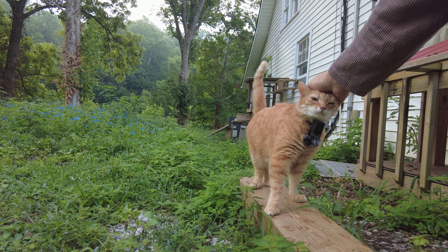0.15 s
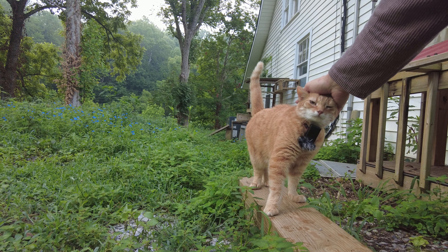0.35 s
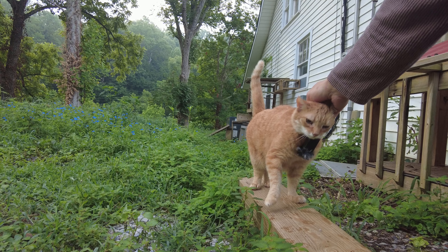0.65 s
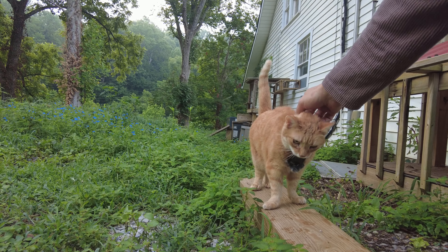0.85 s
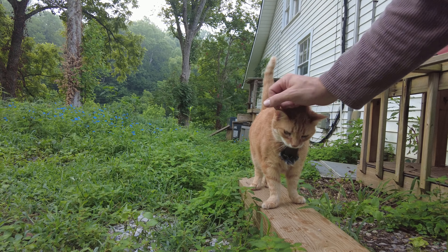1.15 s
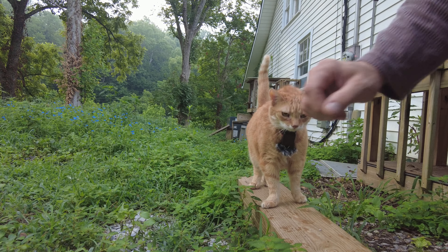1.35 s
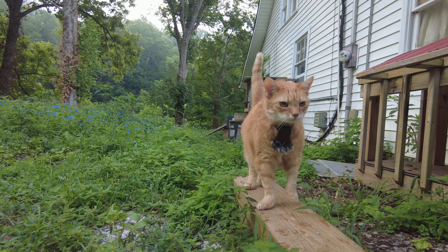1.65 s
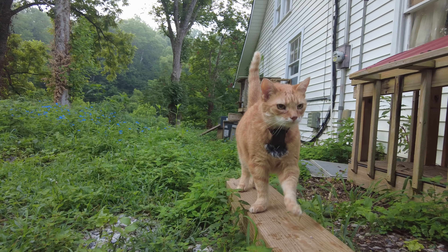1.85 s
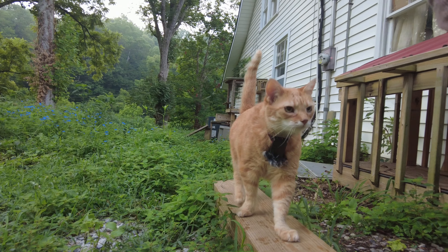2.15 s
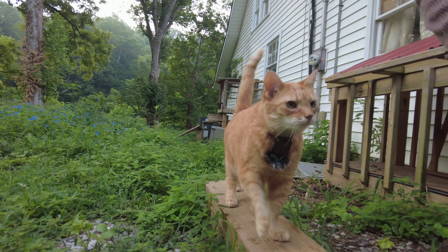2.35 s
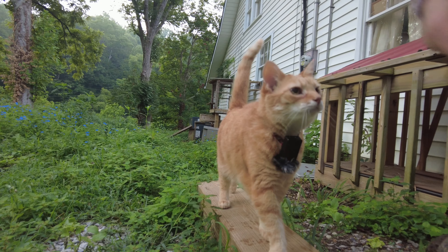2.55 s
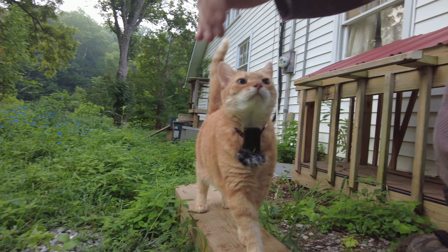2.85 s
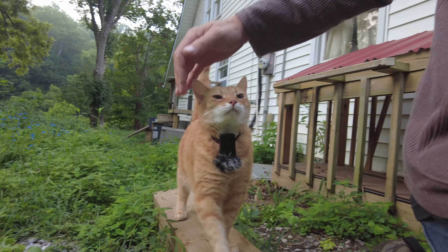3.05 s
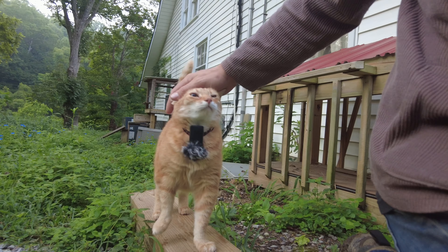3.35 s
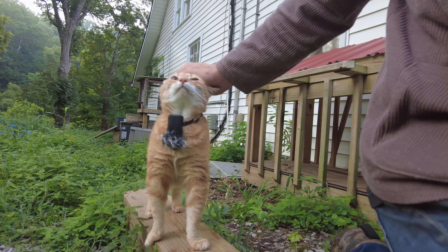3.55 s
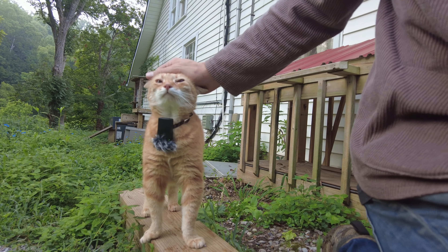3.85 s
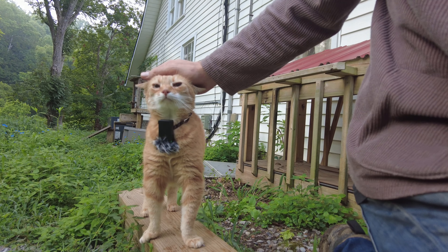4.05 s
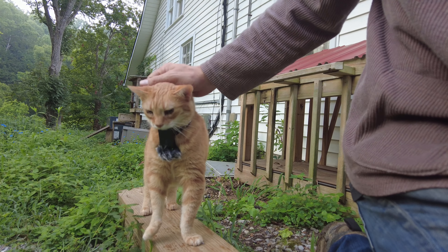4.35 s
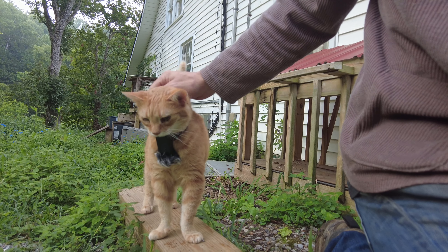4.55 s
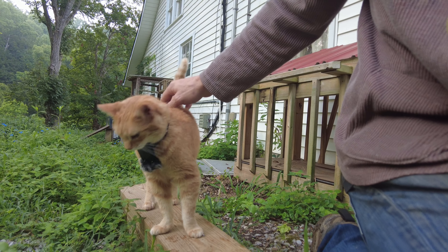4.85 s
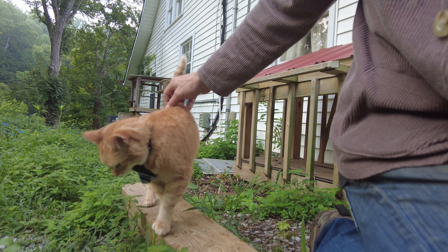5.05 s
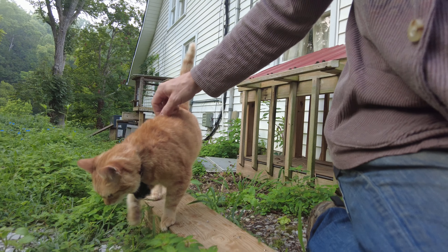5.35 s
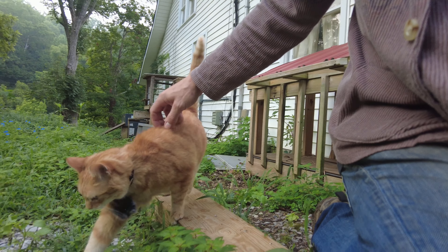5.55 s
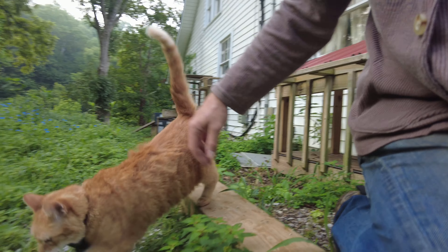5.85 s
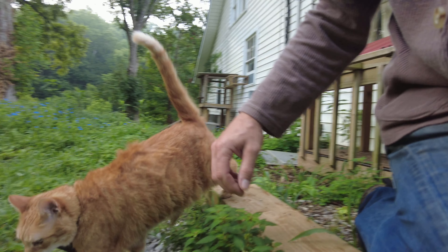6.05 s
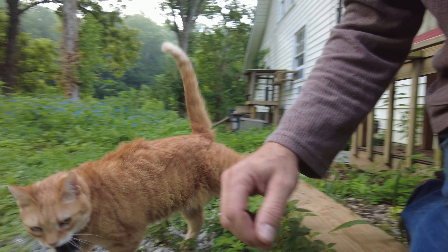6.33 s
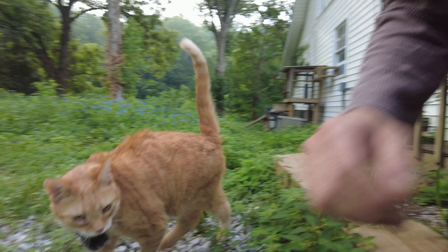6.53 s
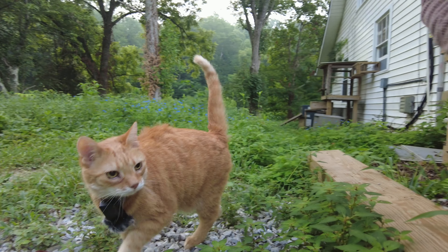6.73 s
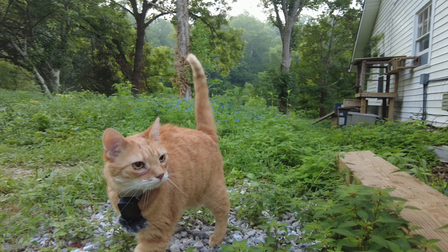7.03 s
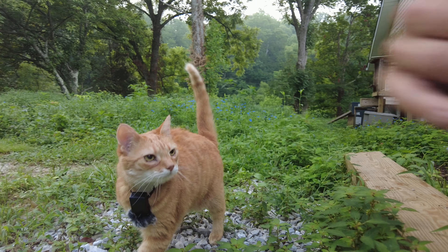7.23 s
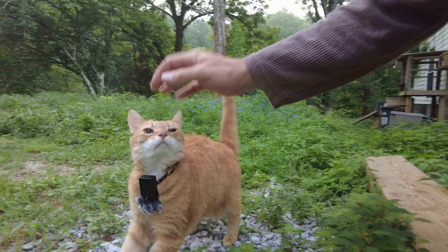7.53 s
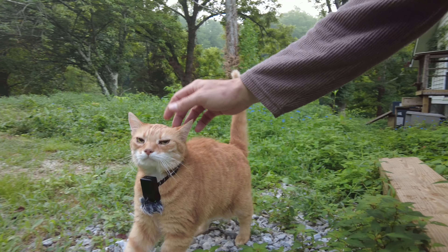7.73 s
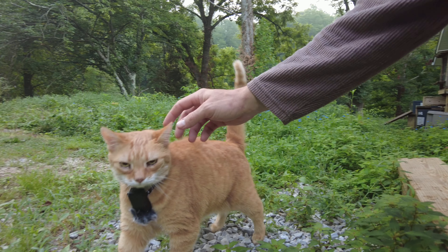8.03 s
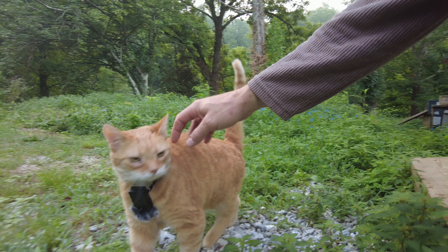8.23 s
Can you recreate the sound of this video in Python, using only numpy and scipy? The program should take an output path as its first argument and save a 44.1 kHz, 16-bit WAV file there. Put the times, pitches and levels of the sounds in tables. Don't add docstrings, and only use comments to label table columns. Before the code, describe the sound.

A steady high insect chorus shimmers over low distant rumble while birds whistle, a cat purrs softly, and twigs and gravel click underfoot.

```python
import sys
import numpy as np
from scipy import signal
from scipy.fft import rfft, irfft, next_fast_len
from scipy.io import wavfile
from scipy.ndimage import uniform_filter1d

SR = 44100
rng = np.random.default_rng(int(sys.argv[2]) if len(sys.argv) > 2 else 0)


def amplitude_ratio(level_db):
    exponent = np.asarray(level_db, float) / 20
    return 10 ** exponent


def store_pcm(level_fs):
    pcm = np.round(np.clip(level_fs, -1, 1) * 32767).astype(np.int16)
    wavfile.write(sys.argv[1], SR, np.atleast_2d(pcm).T)


N = 369999

# (lowest pitch [Hz], highest pitch [Hz], ring width [Hz], level [dB], gain when more join [dB])
CROWDS = [
    (4400, 4834, 280, -3.5, 5),
    (5320, 6010, 690, -4, -0.5),
    (5900, 6620, 220, 3.5, 0),
    (7100, 7880, 280, -15, 2),
]
# (time [s], level [dB])
CHORUS_SWELL = [
    (0, -47.5),
    (1.4, -47.5),
    (1.9, -47),
    (3.0, -45),
    (5.1, -45.5),
    (5.9, -47.5),
    (6.3, -46.5),
    (7.4, -47.5),
    (8.39, -47.5),
]
# (start [s], length [s], level over rest [dB])
NEAR_BOUTS = [
    (1.2, 1.8, 6),
]
ONCE = [0]
SWOOP = [0, .24]
STEP = [0, .25]
BUZZ = [0, .352]
HOOK = [0, .225]
END = [0, .21, .41]
# (repeat delays [s], notes as (time [s], length [s], start [Hz], end [Hz], level [dB]))
FIGURES = [
    (ONCE, [(1.64, .085, 5570, 4870, -44), (1.72, 0.086, 5000, 3260, -38.5), (1.848, 0.0277, 3450, 4430, -36), (2.88, 0.058, 5420, 5430, -42), (4.312, 0.032, 4150, 4830, -40.5), (4.352, .03, 5000, 3480, -45)]),
    (SWOOP, [(2.012, 0.038, 6070, 6080, -36.5), (2.04, 0.042, 5900, 3200, -33), (2.1, .02, 3240, 4980, -38.5), (2.118, 0.026, 4900, 4850, -35)]),
    (STEP, [(2.495, 0.087, 3674, 2915, -42.5), (2.588, 0.013, 3610, 5470, -39), (2.598, .05, 5360, 5470, -43), (2.657, 0.021, 6100, 3320, -34), (2.69, 0.036, 5440, 5500, -56)]),
    (BUZZ, [(3.197, 0.025, 4875, 4400, -39), (3.218, .02, 4400, 3350, -37.5)]),
    (HOOK, [(3.862, 0.0296, 3970, 3090, -47), (3.91, 0.026, 5750, 4760, -39), (3.938, 0.058, 4730, 5700, -40.5)]),
    (END, [(4.385, 0.052, 2560, 3060, -52.5), (4.412, 0.051, 3082, 2990, -47)]),
]
# (time [s], length [s], pitch [Hz], level [dB])
BUZZES = [
    (3.24, 0.11, 3480, -46.5),
    (3.592, 0.12, 3300, -48),
]
# (time [s],
# length [s], start [Hz], end [Hz], level [dB])
CHIPS = [(0.259, 0.077, 1970, 2940, -62), (0.557, 0.019, 3800, 3430, -58), (1.987, 0.023, 7100, 7920, -48),
         (2.225, 0.029, 7200, 7760, -48), (2.233, 0.14, 2300, 2630, -64), (2.373, 0.061, 2410, 2200, -64),
         (3.241, 0.14, 3780, 3700, -54), (3.6, 0.099, 3430, 3200, -57), (3.517, 0.029, 6650, 8200, -42.5),
         (3.833, .02, 7940, 7400, -52), (4.06, 0.02, 8200, 7200, -51), (4.083, .025, 7200, 7100, -51),
         (5.46, 0.017, 7000, 8200, -48), (6.368, 0.12, 2690, 2333, -59), (7.671, .02, 5900, 8240, -39.5),
         (7.721, .015, 5600, 7706, -47), (8.223, .02, 7060, 8360, -55)]
# (start [s], length [s], effort [dB], pulse rate [1/s])
BREATHS = [(-.1, 0.58, -75, 29), (0.984, 0.27, -63, 34), (1.42, 0.48, -59, 32), (2.014, 0.22, -54, 32.5),
           (2.516, .85, -59, 31), (3.56, 0.43, -60.5, 33), (4.07, 0.93, -61, 33.4), (5.052, .17, -61.5, 33),
           (5.588, 1, -57, 30.9), (6.53, 0.68, -54.5, 32.9), (7.412, .66, -56, 30),
           (8.235, 0.21, -58.5, 32.2)]
# (pitch [Hz], width [Hz], level [dB])
CHEST = [
    (334, 240, 7.5),
    (1396, 290, 1),
    (1563, 190, -0.5),
]
# (start [s], length [s], level [dB])
STROKES = [(-.3, 1.62, -78), (1.5, 0.59, -77), (2.0, 0.37, -68.5), (2.4, 1.23, -73.5), (3.55, 0.36, -71.5),
           (4.05, 0.94, -73), (5.08, 0.29, -79), (5.6, 0.761, -72), (6.1, 0.88, -66), (7.06, 0.44, -58),
           (7.4, 0.96, -78)]
# (frequency [Hz], density [dB per Hz])
FUR_TONE = [(470, -35), (800, 1), (964, -12), (1300, 2.5), (1840, -5), (3100, -1), (4080, -2.5),
            (6220, -15), (7040, -10.5), (15600, -13.5)]
# (time [s], peak [dB], left minus right [dB])
TWIGS = [(0.9921, -47, 7), (1.272, -48, 5), (1.3144, -50, 11), (1.6472, -47, 5), (5.8616, -44, 10),
         (6.0874, -38, -10), (6.7437, -43, 5), (6.8483, -45, 10), (6.91, -33, 4), (7.0178, -18, -1),
         (7.0283, -26.5, 7), (7.5231, -46, 3), (8.0391, -41, -4), (6.5492, -41, -4)]
# (time [s], peak [dB], left minus right [dB])
GRAVEL = [(5.7598, -41.5, 3), (6.0327, -31.5, -5), (6.4487, -33, -8.5), (6.4644, -44, -3),
          (6.516, -36.5, -4), (6.6227, -52, -1), (6.6782, -39, -3), (7.0244, -37, -8), (7.0304, -26.5, 2.1),
          (7.4829, -43, 5), (8.113, -34, -3)]
# (time [s], peak [dB], left minus right [dB])
KNOCKS = [(0.5885, -46, 3), (1.0266, -53, -2), (6.1692, -43, 2), (6.1973, -47, 2.1), (6.9774, -44.5, 9),
          (8.3324, -46.5, 3)]
# (events, body pitch [Hz], body width [Hz], relative body level [dB], relative top level [dB])
CLICK_KINDS = [
    (TWIGS, 3900, 3600, -15, -12),
    ([(6.0393, -29.5, 1)], 2700, 3700, -15, 6.4),
    (GRAVEL, 2560, 5600, -4.5, 4),
    (KNOCKS, 550, 4100, 2.6, -16),
]
# (frequency [Hz], density [dB per Hz])
RUMBLE_TONE = [(8.8, -42), (15, 4), (80, -3), (144, -11), (174, -17.5), (210, -20), (389, -29.5),
               (424, -31), (720, -40.5), (900, -44.5), (1170, -45), (1980, -120)]
# (level [dB], share of traffic swell [ratio], random gusts [dB])
RUMBLE_LAYERS = [
    (-34.5, 0.067, -1.6),
    (-44.5, 0.65, 1.3),
    (-53, 0.4, 0.9),
]
# (time [s], level [dB])
TRAFFIC = [
    (0, 4.5),
    (1.1, -2),
    (2.0, -0.5),
    (3.0, 2.5),
    (3.6, -1.5),
    (5.3, -2),
    (5.9, 2),
    (7.3, 7.5),
    (8.39, 2.5),
]
# (frequency [Hz], density [dB per Hz])
AIR_TONE = [(410, -68), (700, -52), (896, -38.5), (1010, -42.5), (1260, -12), (2310, -19), (2530, -16),
            (3080, -16), (3940, -27), (4430, -21), (5240, -12), (6200, -22), (7840, -30.5), (8700, -26.5),
            (15600, -23)]
# (start [s], length [s], strength against the full drop [dB])
MIDDLE_DROPS = [
    (1.19, 0.34, -2),
    (3.93, 0.13, -2.5),
    (4.88, 0.23, -1.5),
    (5.2, 0.49, -1),
]
# (frequency [Hz], left-right likeness [ratio])
LIKENESS = [(60, 0.96), (180, 0.97), (550, 0.075), (1650, -0.076), (4970, 0.17), (15000, -0.19)]
# (frequency [Hz], left minus right [dB])
LEAN = [(60, -1.5), (150, 0.5), (380, 1), (950, 1.5), (2380, 0.5), (5980, -1.0), (15000, 3.5)]
# (centre [Hz], width [Hz], depth [dB])
TREBLE_DIP = (13800, 590, -7.5)


def evened(x):
    return x / np.sqrt(np.mean(x ** 2) + 1e-20)


def read(points, hz):
    f, value = np.transpose(points)
    return np.interp(np.log(hz + 1), np.log(f + 1), value)


def curve(rows, column):
    rows = np.array(rows)
    return np.interp(np.arange(N) / SR, rows[:, 0], rows[:, column])


def ramp(s, rise_s):
    return np.clip((np.arange(N) / SR - s) / rise_s, 0, 1)


def spans(rows, edge):
    t = np.arange(0, N / SR, .002)
    power = np.zeros(len(t))
    for start, length, db, *_ in rows:
        u = (t - start) / length
        to_edge = np.clip(2 * np.minimum(u, 1 - u) / edge, 0, 1)
        power += amplitude_ratio(2 * db) * np.sin(np.pi / 2 * to_edge) ** 4
    return np.interp(np.arange(N) / SR, t, power)


def add(mix, s, sound):
    part = mix[..., round(s * SR):][..., :sound.shape[-1]]
    part += sound[..., :part.shape[-1]]


def ring(x, hz, width_hz):
    b, a = signal.iirpeak(hz, hz / width_hz, SR)
    return signal.lfilter(b, a, signal.lfilter(b, a, x))


def ports(x, lag):
    taps = np.arange(-24, 25)
    window = np.hanning(len(taps))
    return np.array([np.convolve(x, np.sinc(taps - side * lag / 2) * window, "same") for side in (1, -1)])


def hiss(tone, patchy_db, flicker_db, size):
    frames, hz = 4 * N // size + 5, np.fft.rfftfreq(size, 1 / SR)
    a, b, c, d, patches = rng.standard_normal((frames, len(hz), 5)).T
    patches = uniform_filter1d(patches, size=size // 80, axis=0)
    patches = evened(uniform_filter1d(patches, size=12000 // size, axis=1))
    same = np.clip(read(LIKENESS, hz), -1, 1)[:, None]
    left, other = a + 1j * b, c + 1j * d
    z = np.array([left, same * left + np.sqrt(1 - same ** 2) * other])
    flicker = flicker_db * rng.standard_normal(frames)
    z *= amplitude_ratio(read(tone, hz)[:, None] + patchy_db * patches + flicker)
    return evened(signal.istft(z, nperseg=size, noverlap=3 * size // 4)[1][:, :N])


def chorus():
    out = np.zeros((2, N))
    joining = ramp(6.17, rise_s=1.14)
    for low_hz, high_hz, width_hz, db, join_db in CROWDS:
        crowd = np.zeros((2, N))
        for hz in np.linspace(low_hz, high_hz, 5):
            draw = rng.random((2, N)) * SR / 2500
            near, far = (draw < 1) * (2 * draw - 1)
            lag = rng.integers(-6, 7)
            left = near + 0.38 * far
            right = np.roll(near, lag) + 0.35 * far[::-1]
            crowd += ring(np.array([left, right]), hz, width_hz)
        out += amplitude_ratio(db + curve(CHORUS_SWELL, 1) + join_db * joining) * evened(crowd)
    return out


def nearest_insect():
    bursts_per_s, level_db, tone_hz = 37.5, -51, 6550
    wander = evened(uniform_filter1d(rng.standard_normal(N), size=9000))
    beat = np.cumsum(bursts_per_s * (1 + 0.0373 * wander)) / SR % 1
    burst = rng.standard_normal(N) * np.exp(-beat / .25) * (1 - np.exp(-beat / .04))
    early = ring(burst, tone_hz * 1.03, 420)
    late = ring(np.roll(burst, 150), tone_hz * .96, 380)
    strength = np.sqrt(0.26 + spans(NEAR_BOUTS, edge=1.0))
    return amplitude_ratio(level_db) * strength * ports(evened(early + 2.1 * late), lag=-1.84)


def whistle(hz, db):
    wave = np.sin(2 * np.pi * np.cumsum(hz) / SR)
    return np.sqrt(2) * amplitude_ratio(db) * wave * signal.windows.tukey(len(hz), .4)


def songbird():
    out = np.zeros(N)
    for repeats, notes in FIGURES:
        for s, length, start_hz, end_hz, db in notes:
            for later in repeats:
                add(out, s + later, whistle(np.linspace(start_hz, end_hz, round(length * SR)), db))
    swing, swings_per_s = .14, 58
    for s, length, hz, db in BUZZES:
        t = np.arange(0, length, 1 / SR)
        pitch = hz * (1 + swing * signal.sawtooth(2 * np.pi * swings_per_s * t, .25))
        add(out, s, whistle(pitch, db))
    return out


def chips():
    out = np.zeros(N)
    for s, length, start_hz, end_hz, db in CHIPS:
        u = np.linspace(0, 1, round(length * SR))
        add(out, s, whistle(start_hz + (end_hz - start_hz) * np.sin(u * np.pi / 2), db))
    return out


def trees(x, t60, wall_db):
    t = np.arange(SR // 2) / SR
    scatter = amplitude_ratio(-60 * t / t60) * (t > .006)
    slap = amplitude_ratio(wall_db) * np.exp(-((t - .088) / .02) ** 2)
    echoes = rng.standard_normal((2, len(t)))
    sparse = rng.random((2, len(t))) < .05
    tail = echoes * sparse * (scatter + slap)
    return signal.fftconvolve(x[None], tail / np.linalg.norm(tail[0]), axes=1)[:, :N]


def birds():
    song, calls = songbird(), chips()
    echoes = amplitude_ratio(-4.5) * trees(song + 1.1 * calls, t60=.34, wall_db=-18)
    return amplitude_ratio([[-1.3], [1.3]]) * ports(song, lag=5.1) + ports(calls, lag=0.83) + echoes


def purr():
    rates = [(s + length / 2, rate) for s, length, _, rate in BREATHS]
    beat = np.cumsum(curve(rates, 1)) / SR
    strength = amplitude_ratio(2.2 * rng.standard_normal(400))[beat.astype(int) % 400]
    opening = np.exp(-((beat % 1 - .3) / .13) ** 2) + .04
    puffs = strength * opening * rng.standard_normal(N)
    body = sum(amplitude_ratio(db) * evened(ring(puffs, hz, width_hz)) for hz, width_hz, db in CHEST)
    return amplitude_ratio(2.5) * np.sqrt(spans(BREATHS, edge=.4)) * ports(evened(body), lag=1.7)


def rustle():
    noise = hiss(FUR_TONE, patchy_db=1.6, flicker_db=1.5, size=256)
    treble = signal.sosfilt(signal.butter(4, 6500, "high", fs=SR, output="sos"), noise)
    touch = spans(STROKES, edge=.8) + amplitude_ratio(2 * -81)
    leaves_db = -63 + 4.5 * ramp(5.83, rise_s=0.29)
    dry = amplitude_ratio(2 * leaves_db) + amplitude_ratio(2 * 4.5) * touch
    return amplitude_ratio(16) * np.sqrt(touch) * evened(noise - treble) + amplitude_ratio(3.0) * np.sqrt(dry) * evened(treble)


def click(body_hz, width_hz, body_db, top_db):
    t = np.arange(900) / SR
    a, b = rng.standard_normal((2, len(t)))
    snap = a * (np.exp(-t / 0.00045) + 0.38 * np.exp(-t / 0.0035))
    crack = ring(snap, 9100, 6800)
    top = ring(snap, 13500, 5000)
    body = ring(b * np.exp(-t / 0.0032), body_hz, width_hz)
    levels_db = (1.5, top_db, body_db + 3.5)
    return sum(amplitude_ratio(db) * part / abs(part).max() for db, part in zip(levels_db, (crack, top, body)))


def clicks():
    out = np.zeros((2, N))
    for events, *kind in CLICK_KINDS:
        for s, db, pan_db in events:
            sides = amplitude_ratio([[pan_db / 2], [-pan_db / 2]])
            add(out, s, amplitude_ratio(db + 4.0) * ports(click(*kind), lag=-1.03) * sides)
    return out


def rumble():
    size = next_fast_len(N)
    hz = np.fft.rfftfreq(size, 1 / SR)
    noise = rfft(hiss(RUMBLE_TONE, patchy_db=.5, flicker_db=1.72, size=4096), size)
    deep, low = (1 / (1 + (hz / edge_hz) ** 6) for edge_hz in (110, 250))
    out = np.zeros((2, N))
    for (db, share, gust_db), band in zip(RUMBLE_LAYERS, (deep, low - deep, 1 - low)):
        gusts = uniform_filter1d(rng.standard_normal(N), size=6000)
        gusts = evened(uniform_filter1d(gusts, size=6000))
        level = amplitude_ratio(db + share * curve(TRAFFIC, 1) + gust_db * gusts)
        out += level * evened(irfft(noise * band, size)[:, :N])
    return out


def distance():
    bed = rumble() + amplitude_ratio(-54) * hiss(AIR_TONE, patchy_db=1.85, flicker_db=1.9, size=1024)
    middle = signal.sosfiltfilt(signal.butter(3, (450, 4000), "band", fs=SR, output="sos"), bed)
    return bed - 0.73 * np.clip(spans(MIDDLE_DROPS, edge=0.27), 0, 1) * middle


def scene():
    return distance() + chorus() + nearest_insect() + birds() + purr() + rustle() + clicks()


def top_cut(x):
    return signal.sosfilt(signal.butter(12, 16660, fs=SR, output="sos"), x)


def record(dry):
    size = next_fast_len(N)
    hz = np.fft.rfftfreq(size, 1 / SR)
    lean_db = read(LEAN, hz) / 2
    dip_hz, dip_width_hz, depth_db = TREBLE_DIP
    dip_db = depth_db * np.exp(-((hz - dip_hz) / dip_width_hz) ** 4)
    edge_db = -30 * np.clip((hz - 15780) / 100, 0, 1)
    response = amplitude_ratio([lean_db, -lean_db] + dip_db + edge_db)
    finished = irfft(rfft(dry, size) * response, size)[:, :N]
    return top_cut(finished)


dry = scene()
out = record(dry)
store_pcm(out)
```